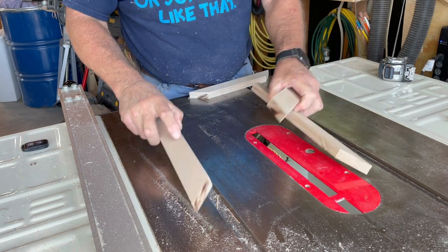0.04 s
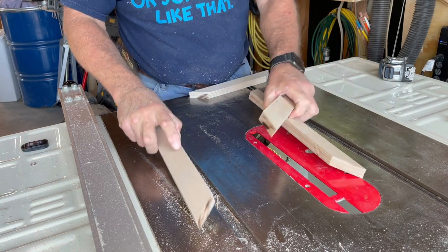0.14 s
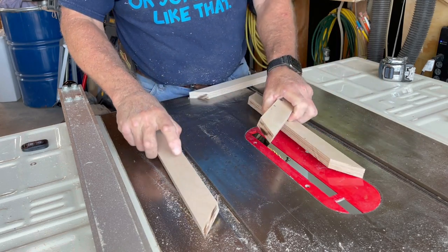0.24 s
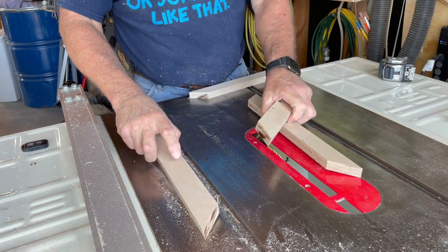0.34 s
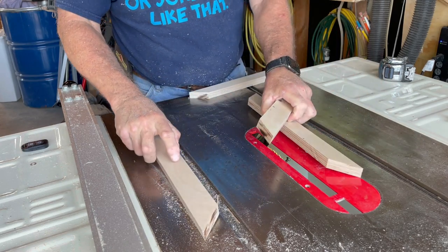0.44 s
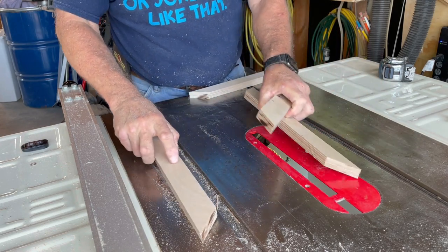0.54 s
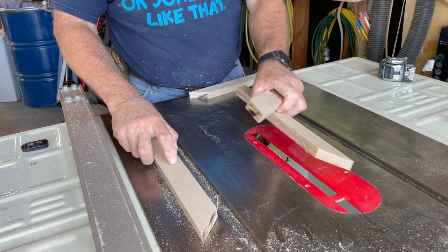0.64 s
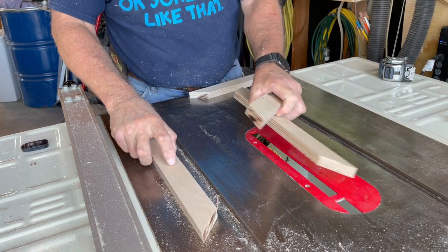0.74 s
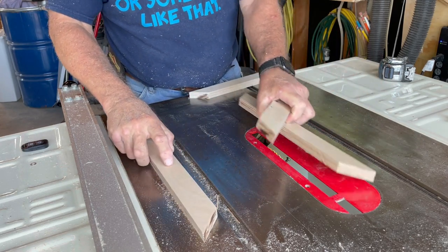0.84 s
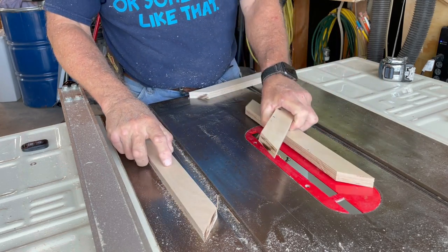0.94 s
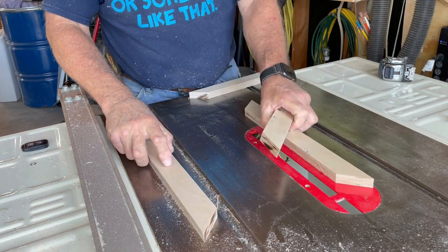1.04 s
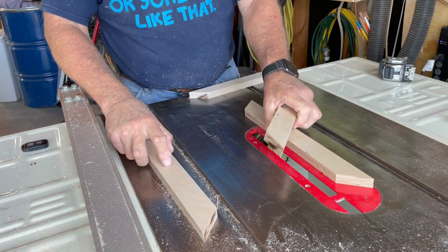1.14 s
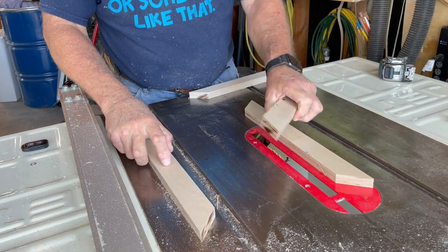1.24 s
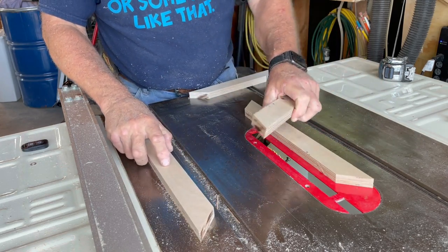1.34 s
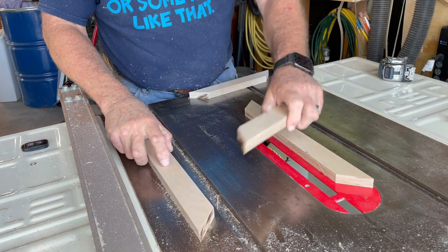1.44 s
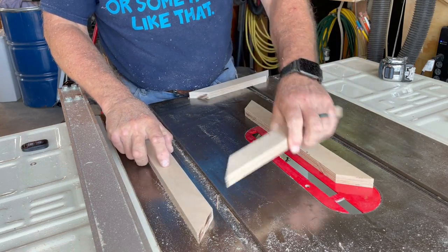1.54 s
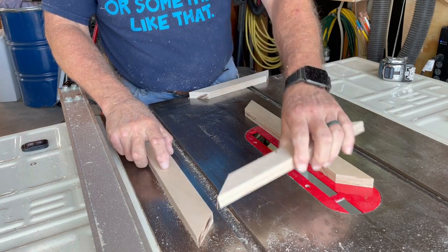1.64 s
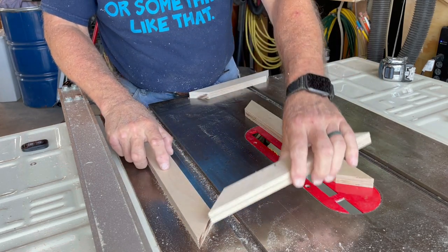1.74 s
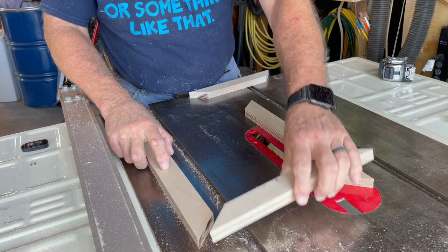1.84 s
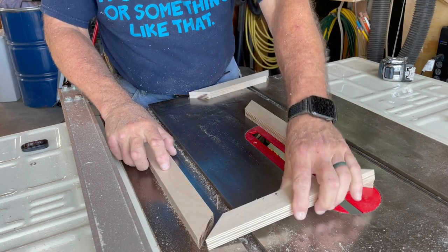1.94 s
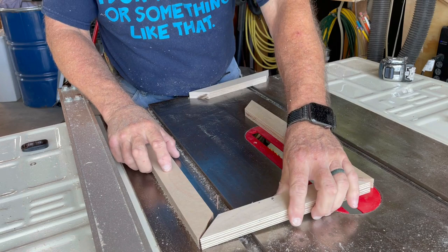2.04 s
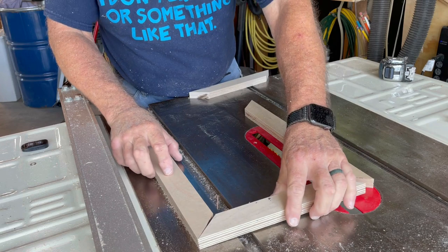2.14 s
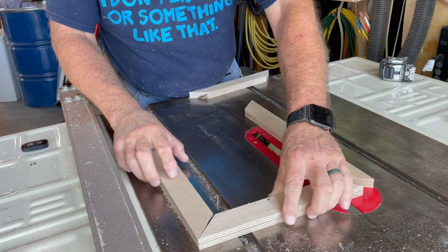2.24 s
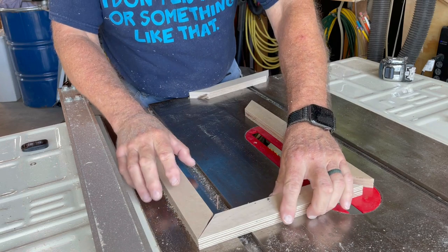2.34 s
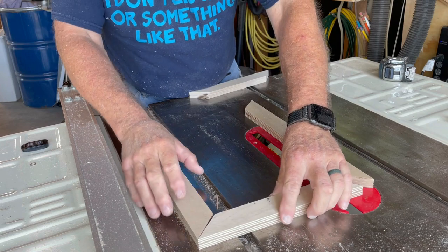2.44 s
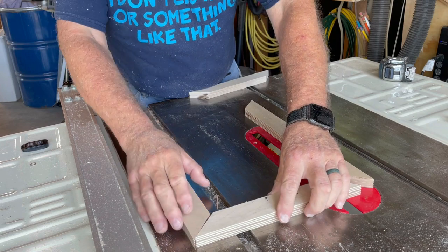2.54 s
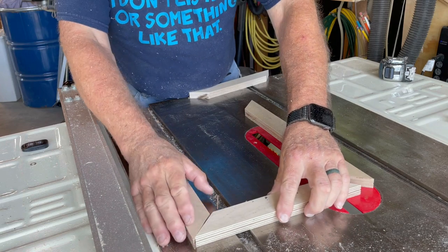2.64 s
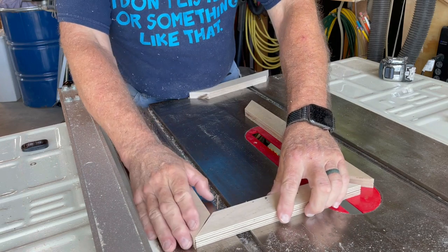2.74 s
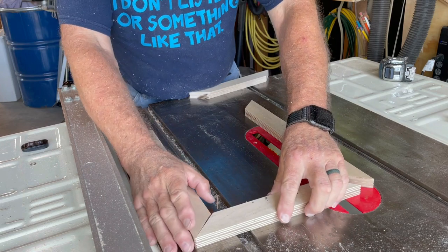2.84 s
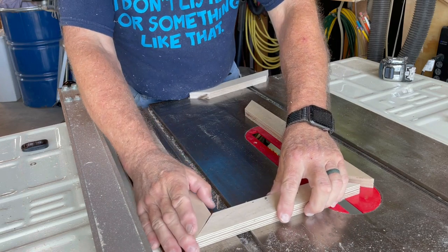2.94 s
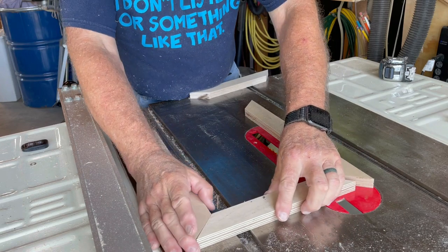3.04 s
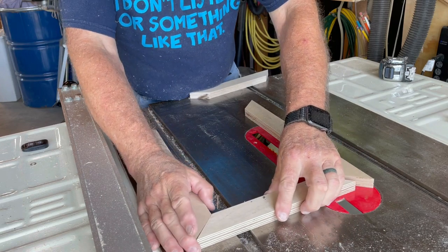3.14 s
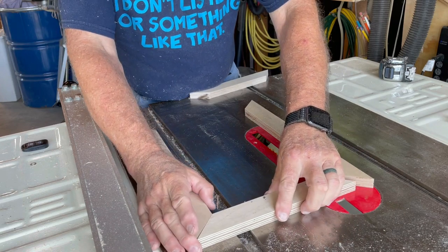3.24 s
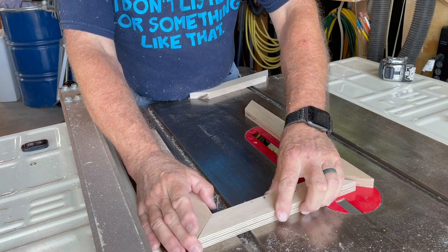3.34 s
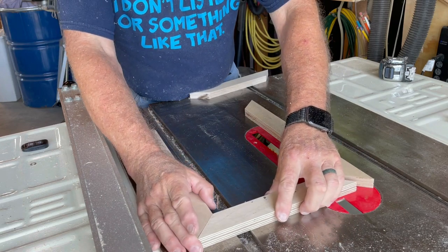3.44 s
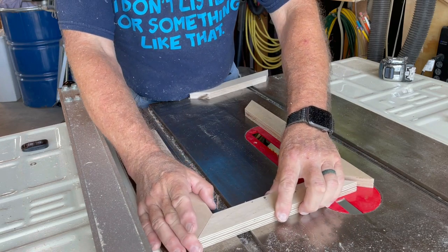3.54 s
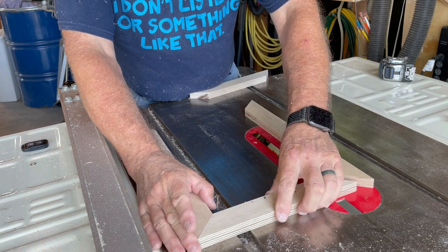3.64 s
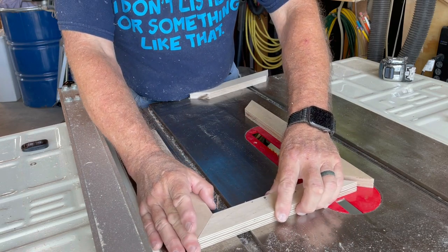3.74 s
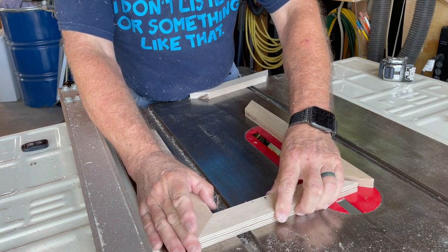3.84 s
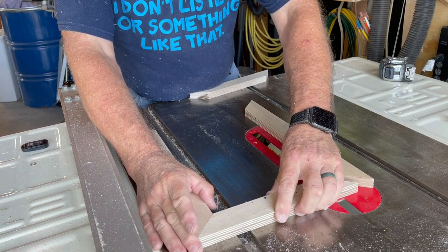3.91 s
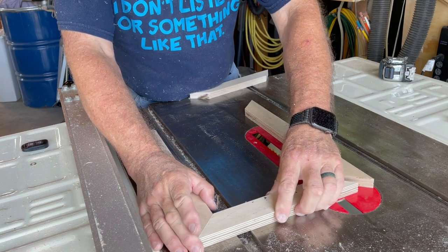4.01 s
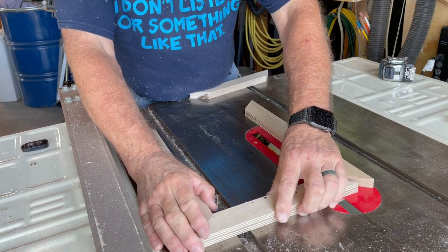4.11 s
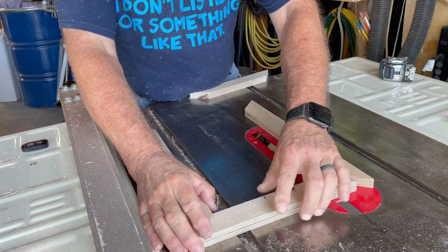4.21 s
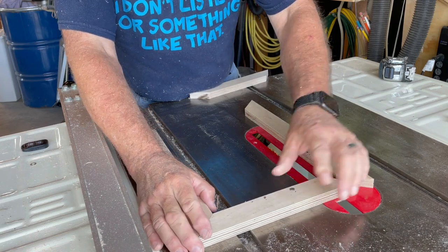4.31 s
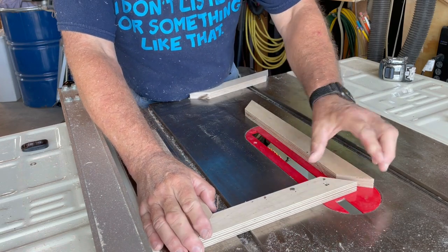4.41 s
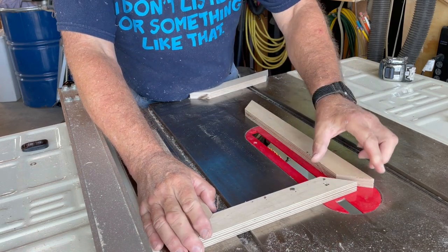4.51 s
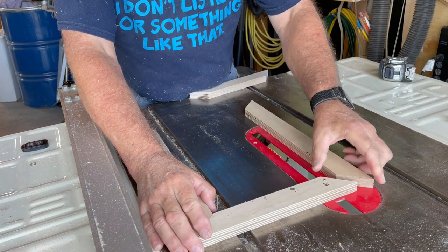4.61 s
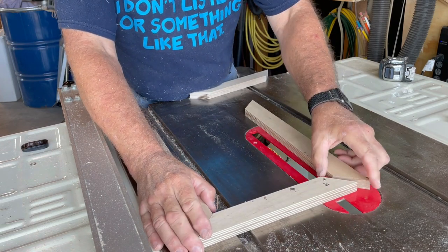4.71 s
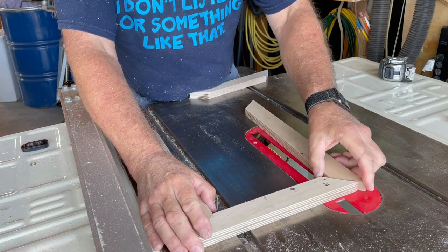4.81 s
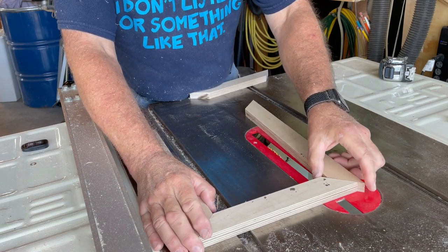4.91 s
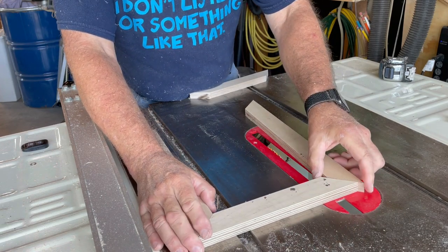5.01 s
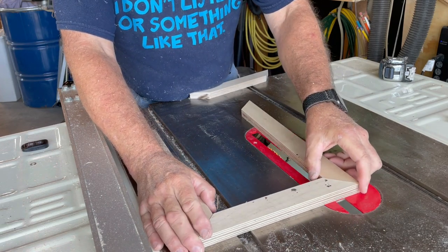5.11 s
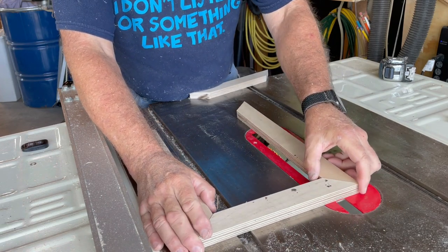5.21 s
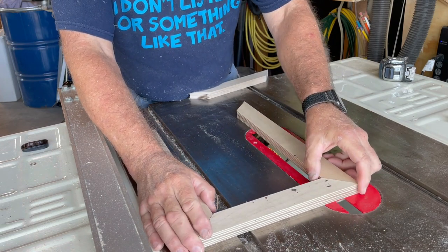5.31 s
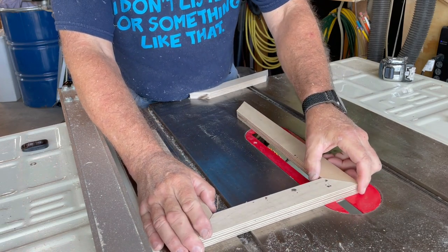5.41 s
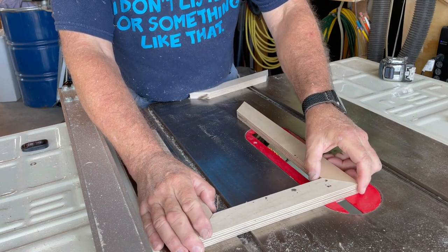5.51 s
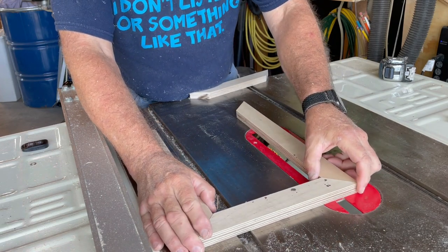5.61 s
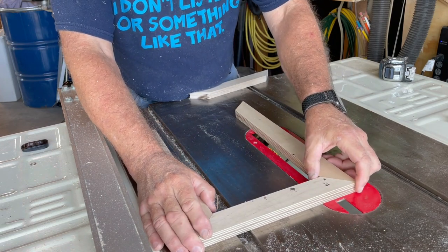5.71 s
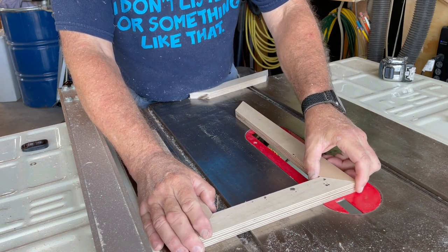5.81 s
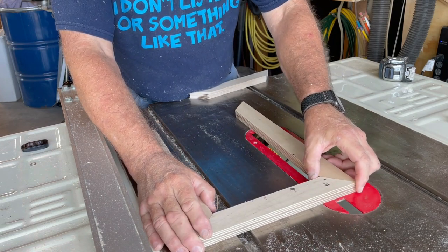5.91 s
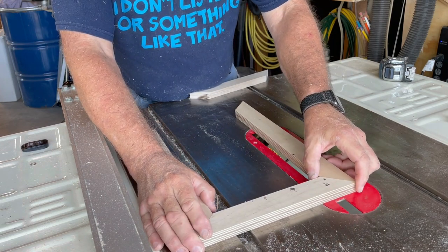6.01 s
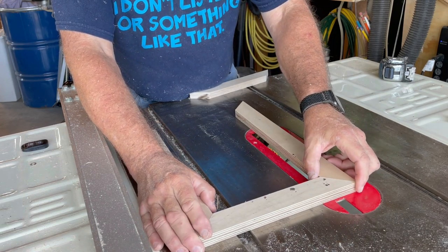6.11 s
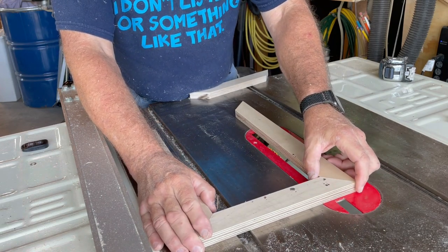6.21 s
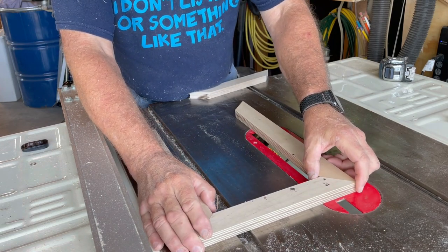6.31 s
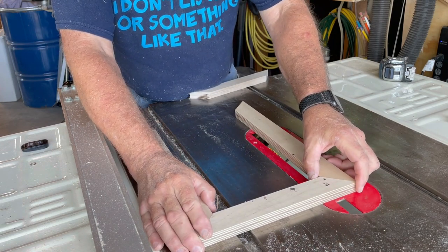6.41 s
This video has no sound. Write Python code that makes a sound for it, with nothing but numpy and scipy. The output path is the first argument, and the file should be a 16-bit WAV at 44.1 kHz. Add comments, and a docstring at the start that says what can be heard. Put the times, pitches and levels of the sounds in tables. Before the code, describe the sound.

Wooden rails clack onto an iron table top, then rub and slide into place over a low, slowly throbbing machine hum.

```python
"""A machine hums steadily: a slowly beating drone, weaker tones, moving air and narrow-band whine.
Over it, mitred wooden frame pieces are set down on the iron top of a table saw and nudged together by hand.
Each knock sums a short snap of wood, damped modes of rail and table, and the answer of a small workshop.
Between knocks, shaped noise gives the rub of wood and hands; a faint gliding tone squeaks late on."""
import sys
import numpy as np
from scipy import signal
from scipy.fft import rfft, irfft, next_fast_len
from scipy.io import wavfile
from scipy.ndimage import map_coordinates

SR = 44100
rng = np.random.default_rng(int(sys.argv[2]) if len(sys.argv) > 2 else 0)


def master(y):
    """Save y as 16-bit WAV."""
    cut = np.clip(np.atleast_2d(y).T, -1, 1)
    pcm = np.round(cut * 32767)  # scale
    wavfile.write(sys.argv[1], SR, pcm.astype(np.int16))


N = 284577

# steady tones of the hum besides the drone: (frequency [Hz], level [dB rms])
HUM_TONES = [(52, -70), (54, -63.5), (80.7, -67), (117.1, -63), (131.2, -62.5), (234.2, -63), (350.6, -74),
             (420.6, -73), (465, -78), (935.3, -88), (1052.4, -75.5), (1285.9, -75), (1755, -83.5),
             (5146, -89.5), (5206, -86)]
# colour of the moving air: (frequency [Hz], relative density [dB per Hz])
AIR_COLOUR = [(28, -27.5), (52, -9), (68, -13), (110, 2.5), (190, -1), (290, -6.5), (400, -14.5),
              (650, -17.5), (1600, -24.5), (2400, -30), (3400, -35), (4700, -33.5), (6300, -43.5),
              (9500, -50), (12500, -54)]
# narrow bands of motor hiss: (centre [Hz], half-width at 1/3 gain [Hz], mean level [dB rms])
WHINE_BANDS = [(4906, 350, -83), (7930, 720, -83)]
# side rails meeting the table: (time [s], level [dB], thump [dB], crack [dB], fizz [dB],
# direct snap [dB], table ring [dB], favoured table pitch [Hz], hand damping, sign ignored [dB/s])
SIDE_KNOCKS = [(.1564, -10.5, 9, -8.5, -3.5, -2.5, -3, 560, 200),
               (.183, -12.5, 10, -7, -7, -25, 2, 560, 202), (.263, -26, 8, 3.5, 7.5, -14, -8, 560, 200),
               (.3328, 2.5, -7.5, -7.5, -25.5, 6, 5, 562, 146), (.9305, -1, -1, -2, 1, -11, -9.5, 745, 0),
               (.934, 11, 5, -1.5, 4.5, -8.5, -2.5, 247, 0), (.9425, 12, -4, -0.5, 1, -11, 0, 947, 0),
               (1.0004, 10, -4.5, 2.5, 1, 4, -6, 745, 0), (1.0058, 8, -6, -1, 6, -1, 3, 745, -1)]
# cross rail meeting the table and its neighbour: same columns
CROSS_KNOCKS = [(1.9538, 1.5, 4, -12, 1, -1.5, 4.5, 745, 103), (2.2612, 13, 0, 0, 2.6, 3, 2, 830, 82),
                (3.712, -36.5, 0, 0.5, 25, 1, -10.5, 745, 200)]
# broad resonances of each rail's first snap: (centre [Hz], full width at 1/3 gain [Hz], level [dB])
SIDE_SNAP_PEAKS = [(1376, 890, -4), (2702, 858, -1.5), (3716, 630, -2.5), (4524, 677, -0.5),
                   (7700, 2730, -19)]
CROSS_SNAP_PEAKS = [(1360, 840, -1), (2614, 540, -0.5), (3105, 460, 1), (4950, 560, -9),
                    (7000, 2240, -37.5)]
# what each rail sends into the room: (frequency [Hz], level [dB])
SIDE_RAIL_COLOUR = [(90, -29), (200, 2.5), (530, 0), (750, 1.5), (1030, 1), (1550, 2), (2100, -1),
                    (2700, -2), (3250, -2), (3750, -1.5), (4650, -5.5), (6300, -12), (8500, -20),
                    (14000, -37)]
CROSS_RAIL_COLOUR = [(90, -22.5), (200, 2), (550, -5), (780, -1), (1000, -3.5), (1400, -4), (2150, -4),
                     (2600, -6), (3100, -1), (3900, -9.5), (4900, -11), (6500, -19.5), (10000, -34.5),
                     (14000, -51.5)]
# ringing modes of the rails, before hand damping: (frequency [Hz], level [dB], t60 [s])
SIDE_MODES = [(1243, -56.5, 0.14), (1515, -48, 0.16), (1654, -49.5, 0.15), (1744, -49, 0.2),
              (2090, -50, .15), (2360, -61.5, .14), (2783, -56, .12), (3563, -53.5, .15),
              (3653, -55.5, .15), (4027, -54.5, .12), (5660, -69, .15), (5819, -59.5, .15),
              (8070, -67, 0.16), (8060, -64.5, .14)]
CROSS_MODES = [(1079, -56.5, 0.18), (1265, -50.5, .16), (1307, -57.5, .16), (1350, -58.5, 0.1392),
               (1485, -55.5, .14), (1791, -50, .3), (2110, -52, .22), (2530, -54, 0.16), (2959, -51, 0.23),
               (3083, -58, .12), (3187, -52, 0.119)]
# modes of the table with wood lying on it, before hand damping: (frequency [Hz], level [dB], t60 [s])
TABLE_MODES = [(175.7, -61.5, .35), (214, -61, .3), (290, -59, .3), (333.3, -53.5, 0.24), (568, -56.5, 0.3),
               (638, -59, .15), (693, -55, .2), (743, -45, 0.19), (802, -56, .2), (857, -53.5, 0.17),
               (956, -54, 0.24), (1155, -48, .18)]
# decay of the shop: (frequency [Hz], t60 [s])
SHOP_T60 = [(120, .65), (300, 0.8), (700, 0.4), (1500, 0.31), (3500, 0.25), (8000, 0.19), (14000, .15)]
# skin and wood chafing: (middle [s], length, two sigma [s], frequency [Hz], level at middle [dB rms])
CHAFES = [(0.227, 0.19, 321, -57.5), (0.552, 0.056, 3300, -60), (1.37, 0.12, 3080, -69.5),
          (1.374, 0.067, 6300, -75), (1.508, 0.29, 3130, -72), (1.593, 0.022, 2670, -62),
          (1.923, 0.056, 6300, -74), (2.19, 0.24, 4400, -70.5), (2.577, 0.044, 5000, -65),
          (2.824, .08, 2580, -71), (3.061, .07, 5050, -72), (3.017, 0.16, 1690, -67),
          (3.044, 0.24, 2450, -71), (3.56, 0.063, 2130, -76), (4.79, 0.12, 744, -63),
          (4.814, 0.18, 1610, -68), (5.14, 0.12, 750, -66.5), (5.204, 0.031, 4000, -63),
          (5.293, 0.11, 6850, -72)]
# hands and wood sliding, one row a stroke: (start [s], length [s], rub [dB], fine hiss [dB])
SLIDES = [(0.505, 0.11, -66, -86), (.78, 0.19, -70, -87), (1.327, 0.17, -70, -82),
          (1.477, 0.24, -65.5, -80), (1.559, 0.038, -71.5, -83), (1.985, 0.27, -66.5, -78.5),
          (2.528, 0.096, -67, -79), (2.649, 0.11, -86.5, -82), (2.745, .15, -70, -77),
          (2.918, 0.232, -66.5, -77), (3.235, 0.047, -76, -91), (4.062, 0.16, -74, -82),
          (4.185, 0.063, -68, -79.5), (4.69, 0.065, -70, -87), (4.77, 0.22, -70.5, -84.5),
          (5.072, 0.19, -59.5, -73.5), (5.674, 0.053, -69, -87)]
# colours of the rub and of the fine hiss: (frequency [Hz], level [dB])
RUB_COLOUR = [(400, -19), (740, 7), (1000, -0.5), (1650, -1), (2500, 1), (3400, -2), (4500, 0.5),
              (7000, -4), (9500, -11), (12000, -31)]
SKIN_COLOUR = [(5000, -33), (9000, 1.5), (12000, -3), (15000, -0.5), (16000, -4)]

DRONE_HZ, DRONE_START_DB, DRONE_GROWTH_DB_PER_S = 100.8, -54.5, 1.23
# weaker tone above the drone: initial offset, rate at which it closes in, level against the drone
BEAT_START_HZ, BEAT_SLOWING_HZ_PER_S, BEAT_DB = 1.255, .064, -7
STROKE_RISE_SHARE, STROKE_FALL_SHARE, STROKE_TAIL_S = 0.31, .3, 0.048
SQUEAK_START_S, SQUEAK_LENGTH_S, SQUEAK_DB = 4.94, .16, -63
TOP_HZ = 15800


def amp(db):
    """Decibels to gain."""
    return 10 ** (np.asarray(db) / 20)


def unit(x):
    """Scaled to rms 1."""
    return x / np.sqrt(np.mean(x ** 2) + 1e-20)


def along(points, hz):
    """(Hz, value) points joined on a log-frequency axis."""
    f, v = np.transpose(points)
    return np.interp(np.log(hz + 1), np.log(f + 1), v)


def wobble(knots_per_s):
    """Smooth random curve through normally distributed knots."""
    knots = rng.standard_normal(int(N * knots_per_s / SR) + 4)
    return map_coordinates(knots, [np.arange(N) * knots_per_s / SR])


def filtered(x, response):
    """x times a response of frequency."""
    size = next_fast_len(N + SR // 2)
    return irfft(rfft(x, size) * response(np.fft.rfftfreq(size, 1 / SR)), size)[:N]


def noise(colour):
    """Noise of rms 1 with a (Hz, dB) colour."""
    return unit(filtered(rng.standard_normal(N), lambda hz: amp(along(colour, hz))))


def hump(hz, centre_hz, width_hz):
    """Gain of one resonance, a third of its peak at width_hz from the centre."""
    return 1 / (1 + 2 * ((hz - centre_hz) / width_hz) ** 2)


def band(centre_hz, width_hz):
    """Noise of rms 1 in one resonance."""
    return unit(filtered(rng.standard_normal(N), lambda hz: hump(hz, centre_hz, width_hz)))


def tone(hz, drift_rad):
    """Sine of rms 1 whose phase wanders slightly."""
    turns = hz * np.arange(N) / SR + rng.random()
    return np.sqrt(2) * np.sin(2 * np.pi * turns + drift_rad * wobble(2))


def drone(waver_db):
    """Two close tones start opposed and beat about once a second, ever slower, while growing louder."""
    t = np.arange(N) / SR
    turns = DRONE_HZ * t + rng.random()
    beats = BEAT_START_HZ * t - BEAT_SLOWING_HZ_PER_S * t ** 2 / 2
    pair = np.sin(2 * np.pi * turns) - amp(BEAT_DB) * np.sin(2 * np.pi * (turns + beats))
    level_db = DRONE_START_DB + DRONE_GROWTH_DB_PER_S * t + waver_db * wobble(9)
    return amp(level_db) * unit(pair)


def machine():
    """A motor: beating drone, weaker steady tones, moving air and wavering narrow-band whine."""
    tones = sum(amp(db) * tone(hz, drift_rad=0.6) for hz, db in HUM_TONES)
    whine = sum(amp(db + 1.2 * wobble(3)) * band(hz, width) for hz, width, db in WHINE_BANDS)
    air = amp(-55.0 + .6 * wobble(4.4)) * noise(AIR_COLOUR)
    return drone(waver_db=1) + tones + whine + air


def pulse(colour_db, size=4096):
    """Minimum-phase pulse: the most compact causal one with spectrum colour_db(Hz)."""
    cepstrum = irfft(np.log(amp(colour_db(np.fft.rfftfreq(size, 1 / SR))) + 1e-6))
    # fold the cepstrum onto positive time
    cepstrum[1:size // 2] *= 2
    cepstrum[size // 2 + 1:] = 0
    return irfft(np.exp(rfft(cepstrum)))


def dispersed(x, lag_s):
    """Bending waves travel as the root of frequency; lag_s is their delay at 1 kHz."""
    hz = np.fft.rfftfreq(len(x), 1 / SR)
    return irfft(rfft(x) * np.exp(-4j * np.pi * lag_s * np.sqrt(1000 * hz)))


def ringing(modes, t, drive_db):
    """Damped sine modes, each struck at a slightly random strength and a random phase."""
    ring = np.zeros(len(t))
    for hz, db, t60_s in modes:
        gain = amp(db + drive_db(hz) + rng.normal(0, 1.2))
        decay = np.exp(-np.log(1000) * t / t60_s)
        ring += gain * decay * np.sin(2 * np.pi * (hz * t + rng.random()))
    return ring


def plate(t, t60_s, spread_db, count=110):
    """Many close upper modes of the iron top, of uneven strength."""
    pitch, size, phase = rng.random(count), rng.standard_normal(count), rng.random(count)
    hz = 1800 + 110 * (np.arange(count) + pitch)
    tones = amp(spread_db * size) @ np.sin(2 * np.pi * (np.outer(hz, t) + phase[:, None]))
    return unit(tones) * np.exp(-np.log(1000) * t / t60_s)


def answer(near_t60_s, near_db, plate_db, far_db, onset_s, size=256):
    """Dense echoes off the bench close by, the ringing iron, then the slower decay of the shop."""
    t = np.arange(SR // 2) / SR
    hz, frames_s, z = signal.stft(rng.standard_normal(len(t)), SR, nperseg=size)
    far_decay = amp(-60 * frames_s / along(SHOP_T60, hz)[:, None])
    far = signal.istft(z * far_decay, SR, nperseg=size)[1][:len(t)]
    near = rng.standard_normal(len(t)) * amp(-60 * t / near_t60_s)
    iron = plate(t, t60_s=.14, spread_db=3.5)
    mix = amp(near_db) * near + amp(plate_db) * iron + amp(far_db) * far
    return mix * (1 - np.exp(-(t / onset_s) ** 2))


def add(track, start_s, sound):
    """Mixes a sound in at start_s."""
    part = track[round(start_s * SR):][:len(sound)]
    part += sound[:len(part)]


def knocks(rows, snap_peaks, rail_colour, modes, baffle_hz):
    """Each blow snaps the rail, rings rail and table and stirs the room, coloured by its own contact."""
    out, t = np.zeros(N), np.arange(SR // 2) / SR

    def snap_gain(hz):
        """Snap resonances, less bass: a narrow rail radiates little of it by itself."""
        peaks = sum(amp(db) * hump(hz, centre, width / 2) for centre, width, db in snap_peaks)
        return peaks * (hz + 1) / np.hypot(hz, baffle_hz)

    for s, db, thump_db, crack_db, fizz_db, snap_db, ring_db, spot_hz, grip_db_per_s in rows:
        contact_points = [(300, thump_db), (1200, 0.00069), (3600, crack_db), (8000, fizz_db)]
        contact = lambda hz: along(contact_points, hz)
        snap = pulse(lambda hz: 20 * np.log10(snap_gain(hz)) + contact(hz))
        body = pulse(lambda hz: along(rail_colour, hz) + contact(hz))
        room = answer(near_t60_s=.06, near_db=-26.0, plate_db=-37.0, far_db=-34.5, onset_s=0.0018)
        echoes = signal.fftconvolve(body, room)
        rail_ring = ringing(modes, t, contact)
        # the spot that is hit favours some table modes
        table_ring = ringing(TABLE_MODES, t, lambda hz: ring_db + 7 * hump(hz, spot_hz, 70))
        # a hand on the wood chokes the ring
        choke = amp(-abs(grip_db_per_s) * t)
        ring = (rail_ring + table_ring) * choke * (1 - np.exp(-t / .005))
        add(out, s, amp(db + snap_db) * dispersed(snap, lag_s=.0005))
        add(out, s, amp(db) * echoes)
        add(out, s, amp(db) * ring)
    return out


def chafes(width_share, rough_db):
    """Sticking friction swells unevenly in one narrow resonance; its width is a share of its pitch."""
    t = np.arange(N) / SR
    swells = np.zeros(N)
    for middle_s, length_s, hz, db in CHAFES:
        swell = np.exp(-2 * ((t - middle_s) / length_s) ** 2)
        swells += amp(db) * swell * band(hz, width_share * hz)
    return swells * unit(amp(rough_db * wobble(50)))


def stroke(start_s, length_s):
    """Gain of one hand movement: speeds up, holds, slows; the rubbing dies away after the hand stops."""
    t = np.arange(N) / SR - start_s
    rise = np.clip(t / (STROKE_RISE_SHARE * length_s), 0, 1)
    fall_s = STROKE_FALL_SHARE * length_s + STROKE_TAIL_S
    fall = np.clip((length_s + STROKE_TAIL_S - t) / fall_s, 0, 1)
    return rise * fall ** 2


def slides(rough_db, catch_db):
    """Wood and fingers drag over the dusty iron: fine grit and slower catches roughen the hiss."""
    grain = unit(amp(rough_db * wobble(400) + catch_db * wobble(45)))
    rub, hiss = grain * noise(RUB_COLOUR), grain * noise(SKIN_COLOUR)
    out = np.zeros(N)
    for start_s, length_s, rub_db, hiss_db in SLIDES:
        out += stroke(start_s, length_s) * (amp(rub_db) * rub + amp(hiss_db) * hiss)
    return out


def squeak(start_hz, end_hz):
    """A thin, faint, unsteady squeak that sinks in pitch, with a weak octave."""
    ends_s = [SQUEAK_START_S, SQUEAK_START_S + SQUEAK_LENGTH_S]
    glide_hz = np.interp(np.arange(N) / SR, ends_s, [start_hz, end_hz])
    phase = 2 * np.pi * np.cumsum(glide_hz * (1 + .006 * wobble(500))) / SR
    level = stroke(SQUEAK_START_S, SQUEAK_LENGTH_S) * amp(SQUEAK_DB + 3.5 * wobble(70))
    return level * (np.sin(phase) + amp(-18) * np.sin(2 * phase))


def scene():
    """All sources summed at one microphone above the table."""
    side = knocks(SIDE_KNOCKS, SIDE_SNAP_PEAKS, SIDE_RAIL_COLOUR, SIDE_MODES, baffle_hz=400)
    cross = knocks(CROSS_KNOCKS, CROSS_SNAP_PEAKS, CROSS_RAIL_COLOUR, CROSS_MODES, baffle_hz=301.3)
    friction = chafes(width_share=0.089, rough_db=3.0) + slides(rough_db=2, catch_db=1.3)
    return (machine() + side + cross + friction + squeak(start_hz=7470, end_hz=7220))[None]


def record(dry):
    """High-pass for the deepest bass, then a sharp band limit at TOP_HZ."""
    highpass = signal.butter(6, 42, "highpass", fs=SR, output="sos")
    x = signal.sosfilt(highpass, dry[0])
    return filtered(x, lambda hz: hz < TOP_HZ)[None]


dry = scene()
out = record(dry)
master(out)
```